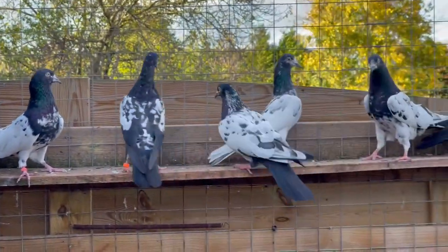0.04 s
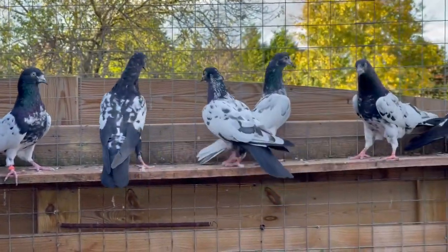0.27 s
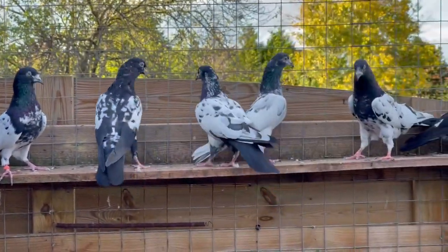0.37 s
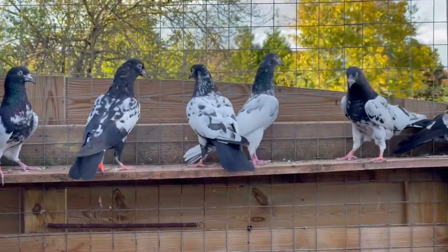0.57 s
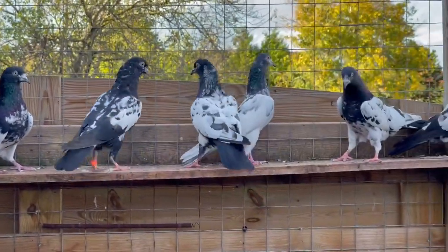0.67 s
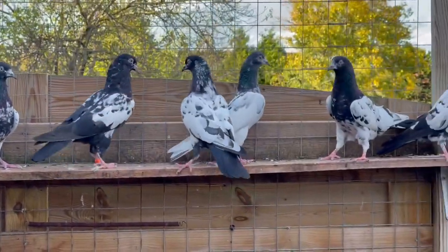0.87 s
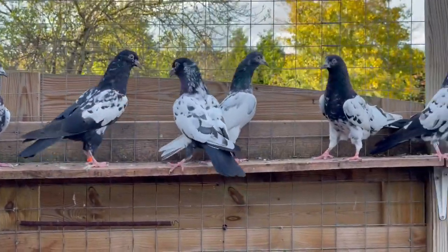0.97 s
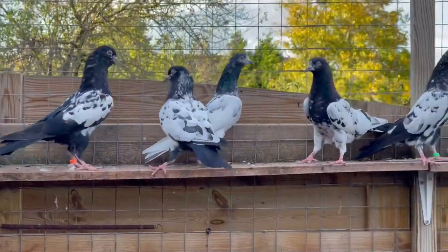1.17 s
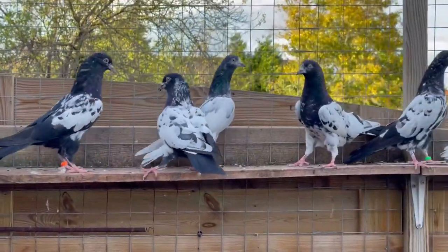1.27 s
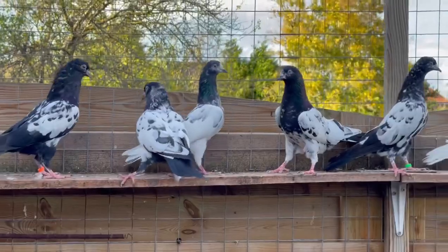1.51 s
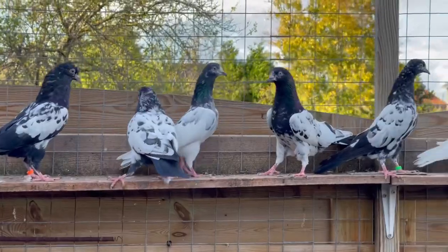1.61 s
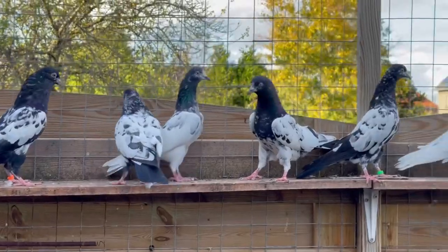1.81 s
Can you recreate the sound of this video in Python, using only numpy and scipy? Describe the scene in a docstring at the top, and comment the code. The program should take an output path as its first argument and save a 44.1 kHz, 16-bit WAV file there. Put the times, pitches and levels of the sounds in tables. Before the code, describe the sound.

Pigeons shuffling and flapping on wooden boards, cooing softly as wind rumbles on the microphone.

```python
"""An outdoor pen, the microphone near a wooden ledge where pigeons shift and scuffle.
Wing tips snap, feathers and feet scuff in dry bursts over a soft rustle and a low, thumping flutter.
The boards ring with dull bumps, a few taps and claw knocks, and the birds give low, husky coos.
A gust rumbles on the microphone and dies away, leaving faint open air and a far drone;
early on, a far songbird whistles once."""
import sys
import numpy as np
from scipy.fft import rfft, irfft, next_fast_len
from scipy.io import wavfile
from scipy.ndimage import map_coordinates

SR = 44100
rng = np.random.default_rng(int(sys.argv[2]) if len(sys.argv) > 2 else 0)


def dump_mix(stems):
    """Bounce the given channels to the path in sys.argv[1] as a 16-bit WAV at rate SR."""
    frames = np.atleast_2d(stems).T  # one column per channel
    limited = np.clip(frames, -1, 1)  # hard clip at full scale
    pcm = np.round(limited * 32767).astype(np.int16)
    wavfile.write(sys.argv[1], SR, pcm)


N = 81585
T = np.arange(N) / SR


def amp(db):
    """Decibels to gain."""
    return 10 ** (np.asarray(db) / 20)


def unit(x):
    """Scaled to rms 1."""
    return x / np.sqrt(np.mean(x ** 2) + 1e-20)


def along(points, hz):
    """A curve through (hz, value) points, read on a log frequency axis."""
    point_hz, values = np.transpose(points)
    return np.interp(np.log(hz + 1), np.log(point_hz + 1), values)


def level(points):
    """Gain per sample from (time_s, level_db) points."""
    return amp(np.interp(T, *np.transpose(points)))


def wobble(per_s):
    """A smooth random curve with per_s knots a second."""
    return map_coordinates(rng.standard_normal(N // 8), [T * per_s], mode="wrap")


def filtered(x, response):
    """x through a filter whose gain is response(hz)."""
    size = next_fast_len(N + SR // 2)
    return irfft(rfft(x, size) * response(np.fft.rfftfreq(size, 1 / SR)), size)[..., :N]


# How alike left and right are for sounds near the microphone: frequency_hz, correlation
NEAR_LIKENESS = [(100, 0.95), (280, 0.91), (430, 0.4), (800, 0.28), (1150, -0.52), (1400, -0.71),
                 (1750, 0.69), (2200, 1), (3300, 1), (4500, 1), (7400, 1), (8100, 0.44), (9300, 0.37),
                 (9900, 0.98), (12000, 1)]

def noise(colour, likeness=NEAR_LIKENESS, shape_db=lambda hz: 0):
    """Coloured stereo noise of rms 1, with optional shaping on top of its spectrum."""
    def response(hz):
        width = np.arccos(np.clip(along(likeness, hz), -1, 1)) / 2
        return amp(along(colour, hz) + shape_db(hz)) * [np.cos(width), np.sin(width)]
    mid, side = filtered(rng.standard_normal((2, N)), response)
    return unit(np.array([mid + side, mid - side]))


def spread(x, turn_rad):
    """The two microphone ports pick the sound up out of step, by turn_rad each way."""
    return filtered(x, lambda hz: np.exp(1j * turn_rad * np.array([[1], [-1]])))


def ring(start_s, modes, rise_s, pitch=1):
    """Struck, damped modes (frequency, gain_db, t60_s); pitch multiplies each frequency."""
    age = np.maximum(T - start_s, 0)
    body = sum(amp(db + rng.normal(0, 1) - 60 * age / t60) * np.sin(2 * np.pi * pitch * frequency * age)
               for frequency, db, t60 in modes)
    return body * (1 - np.exp(-age / rise_s))


def glide(start_s, length_s, start_hz, end_hz, jitter, rise_s=0.016, fall_s=0.017):
    """Phase and envelope of one gliding bird note."""
    end_s = start_s + length_s
    hz = np.interp(T, [start_s, end_s], [start_hz, end_hz]) * (1 + jitter * wobble(49.96))
    envelope = np.clip((T - start_s) / rise_s, 0, 1) * np.clip((end_s - T) / fall_s, 0, 1)
    return 2 * np.pi * np.cumsum(hz) / SR, envelope


# Open air beyond the pen: frequency_hz, density_db
AIR_COLOUR = [(20, -21), (55, 13.5), (130, -7.5), (215, 2), (350, 2.5), (500, -5), (800, -6.5), (1100, -5),
              (1400, -14.5), (2000, -21.5), (3200, -24.5), (6000, -27), (9500, -26.5), (11000, -40.5),
              (12500, -93), (16000, -90)]
# How alike that air is left and right: frequency_hz, correlation
AIR_LIKENESS = [(60, 0.51), (250, 0.77), (400, 0.82), (800, 0.11), (1150, -0.18), (1600, 0.28), (2200, 1),
                (7400, 1), (8100, 0.74), (9300, -0.0062), (9900, 0.46)]

def open_air(level_db=-48.5):
    """Far air, a low and nearly steady hush."""
    return amp(level_db + 0.3 * wobble(7.57)) * noise(AIR_COLOUR, AIR_LIKENESS)


def far_drone(pitch_hz=213.1, level_db=-59):
    """A faint tone in the distance, wavering in level and phase."""
    return amp(level_db + wobble(7.6)) * np.sin(2 * np.pi * pitch_hz * T + 0.5 * wobble(11.2))


# One note from far off: start_s, length_s, start_hz, end_hz
WHISTLE = (.265, 0.12, 4640, 3900)

def far_songbird(level_db=-69.5, fade_db_per_s=24):
    """A thin falling whistle, blurred by the trees."""
    phase, envelope = glide(*WHISTLE, jitter=0.00633)
    fade_db = fade_db_per_s * np.maximum(T - WHISTLE[0], 0)
    return amp(level_db - fade_db) * envelope * unit(np.sin(phase + wobble(280)))


# Wind right on the microphone: time_s, level_db
GUST_LEVEL = [(0, -40.5), (.08, -42.5), (.15, -50), (.22, -44.5), (.28, -42.5), (.45, -42), (.52, -44.5),
              (.57, -29.5), (.66, -39), (.77, -24), (.85, -32.5), (.97, -27), (1.13, -28.5), (1.22, -38),
              (1.33, -39), (1.42, -52.5), (1.56, -58), (1.85, -76)]
# Its rumble: frequency_hz, density_db
GUST_COLOUR = [(20, -20), (27, -33), (35, -13.5), (52, 2), (75, 0.5), (110, -2.5), (200, -12.5), (290, -17),
               (420, -26.5), (700, -39), (1500, -39.5), (5000, -120)]

def gust():
    """A lumpy gust buffets the microphone and dies away."""
    lumps = unit(amp(0.41 * wobble(29.4)))
    return level(GUST_LEVEL) * lumps * noise(GUST_COLOUR)


# Feathers brushing on the ledge: time_s, level_db
RUSTLE_LEVEL = [(0, -65), (.3, -68.5), (.36, -57), (.42, -73), (.51, -54.5), (.56, -49.5), (.66, -50.5),
                (.80, -51), (.88, -52.5), (1.0, -54), (1.06, -54.5), (1.16, -55.5), (1.3, -59.5),
                (1.52, -58), (1.73, -60), (1.8, -56), (1.85, -61)]
# Their dry hiss: frequency_hz, density_db
RUSTLE_COLOUR = [(300, -1), (900, 7), (2000, 3.5), (3200, -2), (5500, -3), (8000, 2), (10000, 1),
                 (11800, -20), (12700, -44), (16000, -50)]
# Feet rubbing the boards: time_s, level_db
SHUFFLE_LEVEL = [(0, -53.5), (.5, -60.5), (.54, -40.5), (.59, -45), (.63, -40.5), (.69, -46.5),
                 (.78, -45.5), (.85, -44.5), (.93, -52.5), (1.1, -64), (1.32, -59), (1.52, -50),
                 (1.67, -52), (1.75, -54), (1.85, -52)]
# Their hollow tone: frequency_hz, density_db
SHUFFLE_COLOUR = [(150, -53), (350, -2), (560, -2), (800, -4), (1100, -10), (1500, -15), (4000, -78)]
GRAIN_PER_S = 1400

def rustle(grain_db=1.5):
    """Feathers brush and feet rub the boards between the scuffs."""
    sway_db = 1.4 * wobble(45)
    grain = unit(amp(grain_db * wobble(GRAIN_PER_S) + sway_db))
    feathers = level(RUSTLE_LEVEL) * grain * noise(RUSTLE_COLOUR)
    feet = level(SHUFFLE_LEVEL) * unit(amp(2.4 * wobble(70))) * noise(SHUFFLE_COLOUR)
    return feathers + feet


# Pigeon voices in the pen: start_s, length_s, start_hz, end_hz, level_db, roughness
COOS = [(0.302, 0.062, 346.4, 364, -42.5, 0.6), (0.412, 0.04, 369.4, 345, -40.5, 0.67),
        (0.742, 0.079, 529.7, 483, -41.5, 0.5), (0.729, 0.033, 266.3, 271, -39, 0.7),
        (0.771, 0.085, 378, 365, -35.5, 0.32), (0.863, 0.14, 356, 332, -42.5, 0.21),
        (1.412, 0.067, 243.7, 277, -49.5, 0), (1.498, 0.096, 545.3, 546, -53, 0.28),
        (1.53, 0.052, 316, 335, -46, 0.27), (1.584, 0.069, 422, 401, -44, 0.2),
        (1.65, 0.076, 230.5, 211, -47, 0.9), (1.682, 0.028, 335, 376, -34.5, 0.4),
        (1.73, 0.071, 347.5, 353, -53, 0), (1.781, 0.04, 349, 378, -37.5, 0.54),
        (1.809, 0.037, 240, 281, -42, 0.8)]
# Harmonics of a coo: multiple, gain_db
COO_HARMONICS = [(1, 18), (2, -10.5), (3, -29)]

def coos(husk_rad=1.05, flutter_per_s=110):
    """Nearly pure gliding notes that flutter and turn husky when rough."""
    voice = np.zeros(N)
    for start_s, length_s, start_hz, end_hz, db, roughness in COOS:
        phase, envelope = glide(start_s, length_s, start_hz, end_hz, jitter=0.012)
        phase += husk_rad * roughness * wobble(flutter_per_s)
        tone = unit(sum(amp(gain_db) * np.sin(k * phase) for k, gain_db in COO_HARMONICS))
        voice += amp(db) * envelope * tone * unit(1 + roughness * wobble(flutter_per_s))
    return spread(voice, turn_rad=0.32)


# Weight landing on the ledge: start_s, level_db, pitch_hz
BUMPS = [(.178, -24, 64.5), (.361, -20.5, 143.5), (.370, -19.5, 72), (.484, -22.5, 89),
         (0.534, -21.5, 91.4), (.535, -32.5, 366.5), (.547, -17.5, 144.7), (0.642, -27, 145),
         (0.688, -30, 213), (0.757, -24, 69.5), (0.958, -23, 71.5), (1.025, -16.5, 103),
         (1.105, -17.5, 76.6)]
# Low modes of the boards: pitch_ratio, gain_db, t60_s
BUMP_MODES = [(1, 5, 0.071), (1.9, -11, 0.059), (3.1, -16, 0.046)]

def board_bumps():
    """Soft weight makes the boards thud."""
    thuds = sum(amp(db) * ring(start_s, BUMP_MODES, rise_s=0.0044, pitch=hz) for start_s, db, hz in BUMPS)
    return spread(thuds, turn_rad=0.24)


# Light steps on the ledge: start_s, level_db
TAPS = [(.533, -44), (.622, -45), (.640, -41), (.835, -50), (1.187, -44), (1.433, -51.5), (1.653, -47.5),
        (1.709, -44)]
# Wood under a toe: frequency_hz, gain_db, t60_s
TAP_MODES = [(668, -3, 0.092), (844, 4, 0.022), (1383, 1, 0.023), (1585, -1.5, 0.026), (1900, -9, 0.049),
             (2850, -22, 0.022), (3145, -6.5, 0.023)]
# Claws striking the ledge: start_s, level_db, pitch_hz
CLAWS = [(0.949, -36, 1710), (1.0405, -47, 1820), (1.0774, -36.5, 2170)]
# Wood under a claw: pitch_ratio, gain_db, t60_s
CLAW_MODES = [(1.01, -2.5, 0.014), (1.13, -9, 0.011), (3.2, -23, 0.0081), (0.475, -6, 0.02)]

def toes_and_claws():
    """A toe makes the boards tick; a claw knocks them sharply."""
    ticks = sum(amp(db) * ring(start_s, TAP_MODES, rise_s=0.0011) for start_s, db in TAPS)
    knocks = sum(amp(db) * ring(start_s, CLAW_MODES, rise_s=0.00061, pitch=hz)
                 for start_s, db, hz in CLAWS)
    return spread(ticks + knocks, turn_rad=0.1)


# Low, uneven flutter near the microphone: time_s, level_db
FLUTTER_LEVEL = [(0, -53), (.6, -54.5), (.76, -40.5), (.88, -50), (.98, -41.5), (1.08, -39.5),
                 (1.17, -41.5), (1.26, -40), (1.36, -46), (1.47, -65.5), (1.85, -62)]
# Its dull body: frequency_hz, density_db
FLUTTER_COLOUR = [(70, -20), (130, -0.5), (180, -0.5), (265, -1), (330, -20.5), (480, -17.5), (1200, -89),
                  (5000, -120)]
# Short, firm thumps in the scuffle: start_s, level_db, pitch_hz
THUMPS = [(0.75, -22, 216), (0.961, -19, 163), (0.991, -24.5, 170), (1.043, -17, 162), (1.0624, -9.5, 180),
          (1.085, -15, 163), (1.156, -20.5, 207), (1.178, -13.5, 161), (1.202, -24, 177), (1.236, -21, 178)]

def flutter(t60_s=0.038):
    """A dull beating that swells with the scuffle and breaks into separate thumps."""
    beating = level(FLUTTER_LEVEL) * unit(amp(3.0 * wobble(55.06))) * noise(FLUTTER_COLOUR)
    thumps = sum(amp(db) * ring(start_s, [(hz, 0, t60_s)], rise_s=0.0038) for start_s, db, hz in THUMPS)
    return beating + spread(thumps, turn_rad=0.24)


def stroke(start_s, rise_s, fall_t60_s=0.069, tail_db=-6.5, tail_t60_s=0.2):
    """Envelope of one scuff: rise, quick fall and soft tail."""
    age = np.maximum(T - start_s - rise_s, 0)
    decay = np.hypot(amp(-60 * age / fall_t60_s), amp(tail_db - 60 * age / tail_t60_s))
    return np.clip((T - start_s) / rise_s, 0, 1) * decay


# Feathers and feet scuffing, near and straight ahead: start_s, rasp_db, scrape_db, rise_s, pitch_hz
SCUFFS = [(0.018, -56.5, -52.5, 0.0075, 1770), (.134, -60.5, -59, 0.0079, 1800),
          (0.365, -51, -53, 0.0026, 1500), (0.481, -53.5, -63, 0.0012, 2100),
          (0.5313, -31.5, -40.5, 0.0012, 1900), (0.543, -41, -42.5, .0015, 2030),
          (0.607, -44, -48, 0.00067, 2300), (.621, -50, -42, 0.0013, 1620),
          (0.675, -52.5, -56, 0.0011, 2400), (0.724, -47.5, -46, 0.0041, 1910),
          (0.782, -42.5, -44, 0.0025, 2320), (0.832, -45.5, -41, 0.0037, 3250),
          (.846, -50, -47, .003, 1910), (0.895, -53, -56, 0.0027, 1700), (0.9492, -47.5, -44, 0.0011, 2180),
          (1.011, -47, -49.5, .005, 1580), (1.038, -50, -49.5, 0.0021, 1800),
          (1.077, -50.5, -51, .001, 2150), (1.177, -57, -52.5, 0.0034, 1540),
          (1.778, -56.5, -66, .008, 2600), (1.811, -46, -71, 0.0054, 3000)]
# The bright rasp: frequency_hz, density_db
RASP_COLOUR = [(500, 8.5), (2500, -10.5), (4000, -28), (4700, 2.5), (5400, -2), (6500, 4.5), (8000, 7.5),
               (10000, 7), (11800, -4), (12700, -16), (16000, -39)]
# The lower scrape: frequency_hz, density_db
SCRAPE_COLOUR = [(300, -30), (900, 5.5), (1300, -7), (1900, -3.5), (2700, -7.5), (3600, -7.5), (5000, -7.5),
                 (9000, -15), (16000, -71)]

def scuffs(ripple_db=5, ripple_spacing_hz=69.65, spot_db=7, spot_width_oct=0.2, grain_db=1):
    """Grainy bursts: a rasp with narrow, irregular ringing peaks, over the scraped spot's resonance."""
    peaks = rng.standard_normal(N // 8)
    ripple = lambda hz: ripple_db * map_coordinates(peaks, [hz / ripple_spacing_hz], mode="wrap")
    rasp_power = sum((amp(db) * stroke(start_s, rise_s)) ** 2 for start_s, db, _, rise_s, _ in SCUFFS)
    sound = np.sqrt(rasp_power) * noise(RASP_COLOUR, shape_db=ripple)
    for start_s, _, db, rise_s, pitch_hz in SCUFFS:
        spot = lambda hz: spot_db / (1 + (np.log2((hz + 1) / pitch_hz) / spot_width_oct) ** 2)
        sound += amp(db) * stroke(start_s, rise_s) * noise(SCRAPE_COLOUR, shape_db=spot)
    return sound * unit(amp(grain_db * wobble(GRAIN_PER_S)))


# Wing tips snapping near the microphone: start_s, level_db, top_hz
SNAPS = [(0.5322, -29.5, 13800), (0.5336, -40, 12500), (.6072, -38, 9450), (.8352, -40, 7800)]
# Their crisp crack: frequency_hz, density_db
SNAP_COLOUR = [(1000, -7), (4500, -4), (9500, 0), (13000, -13), (15000, -4), (16000, -22)]

def wing_snaps(t60_s=0.018):
    """Stiff wing tips meet in a short crack; the lighter ones are duller."""
    sound = np.zeros((2, N))
    for start_s, db, top_hz in SNAPS:
        age = np.maximum(T - start_s, 0)
        roll_off = lambda hz: -10 * np.log10(1 + (hz / top_hz) ** 20)
        sound += (T >= start_s) * amp(db - 60 * age / t60_s) * noise(SNAP_COLOUR, shape_db=roll_off)
    return sound


def scene():
    """From the microphone, wind, open air, flutter, boards and coos lean slightly left; the rest is centred."""
    lean_left = amp([[0.29], [-0.29]])
    leaning = gust() + open_air() + flutter() + board_bumps() + toes_and_claws() + coos()
    centred = scuffs() + wing_snaps() + rustle() + far_drone() + far_songbird()
    return leaning * lean_left + centred


def record(dry, low_cut_hz=30, top_hz=16200):
    """The recorder thins the deepest rumble and keeps nothing above its band limit."""
    return filtered(dry, lambda hz: (hz < top_hz) * hz ** 2 / np.hypot(hz ** 2, low_cut_hz ** 2))


dry = scene()
out = record(dry)
dump_mix(out)
```